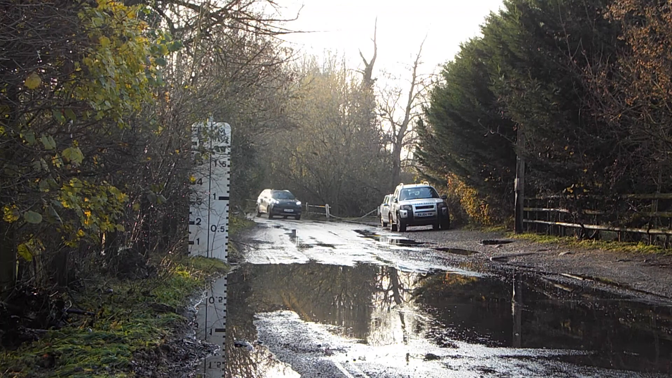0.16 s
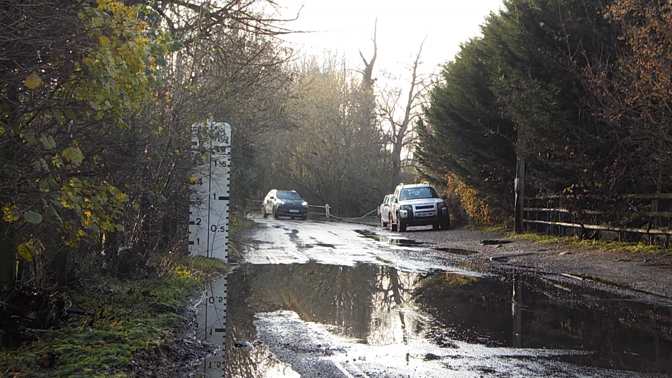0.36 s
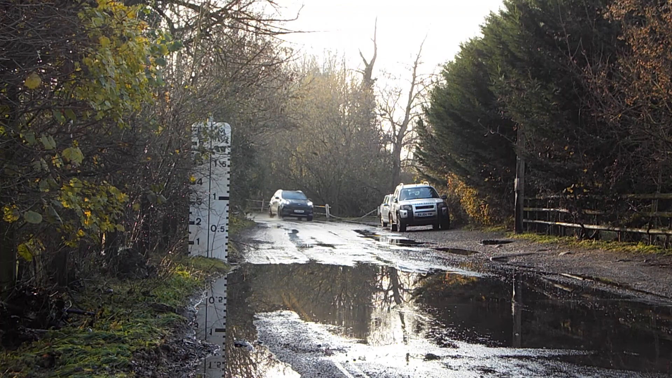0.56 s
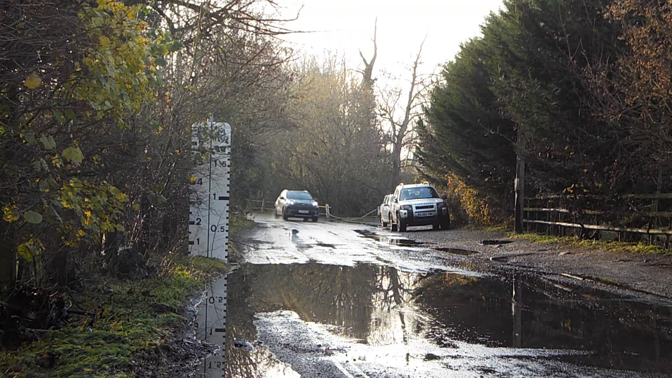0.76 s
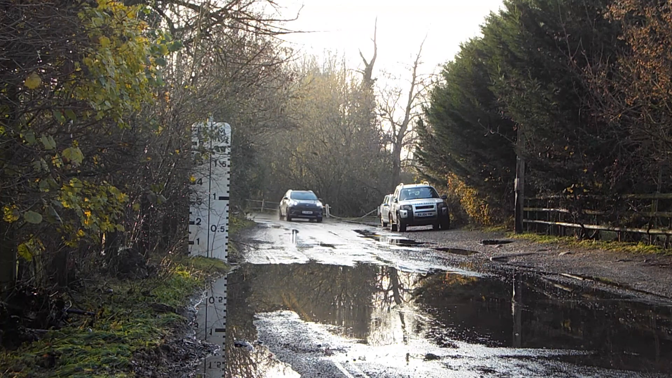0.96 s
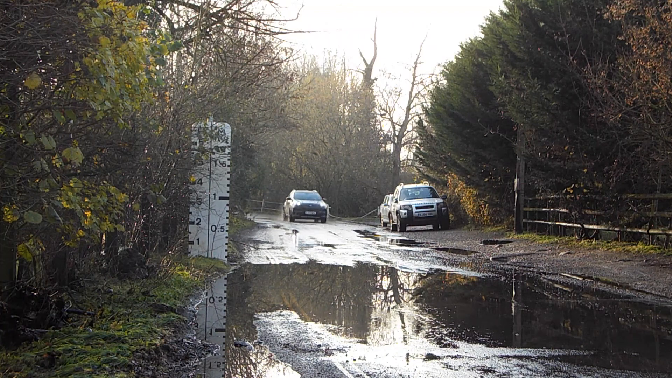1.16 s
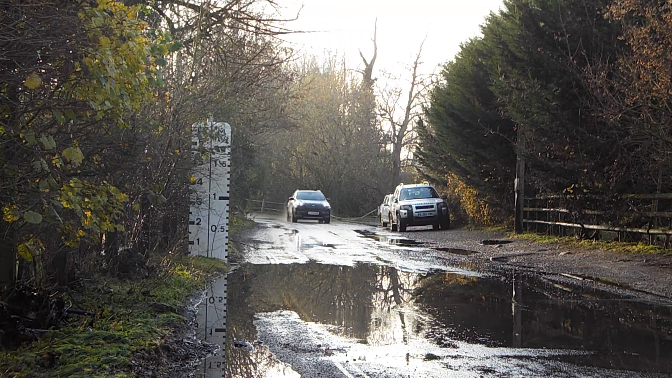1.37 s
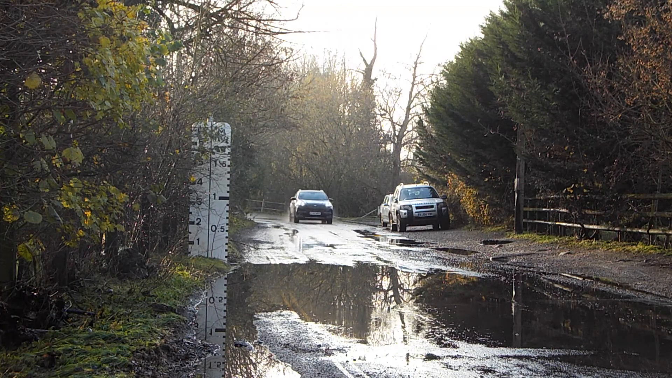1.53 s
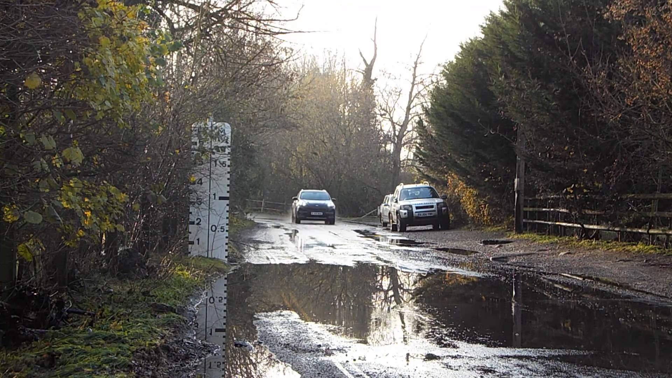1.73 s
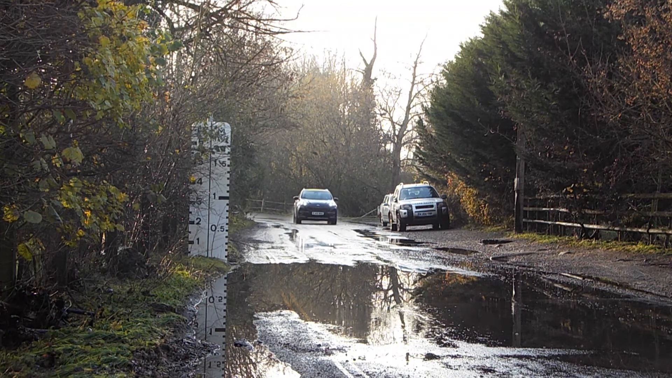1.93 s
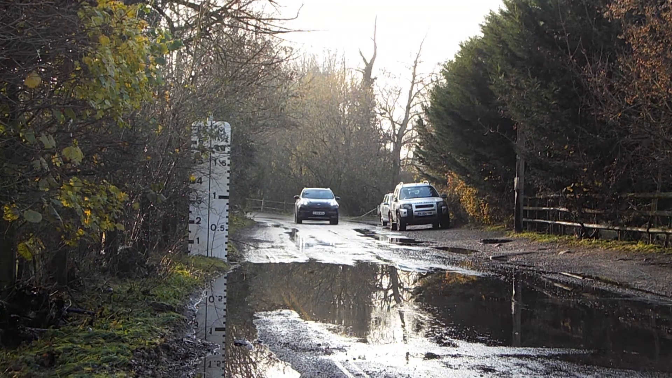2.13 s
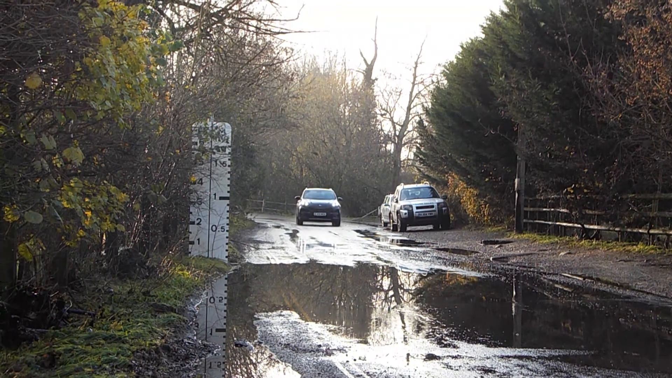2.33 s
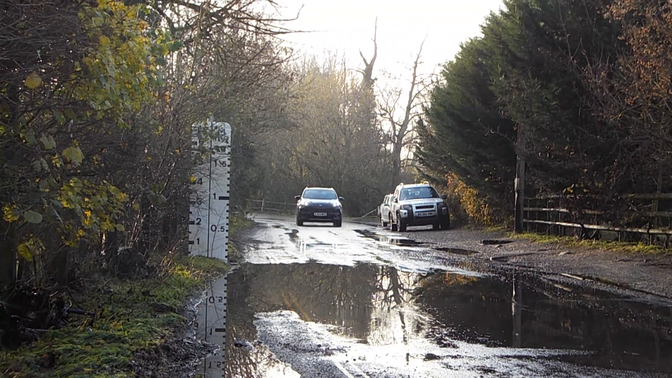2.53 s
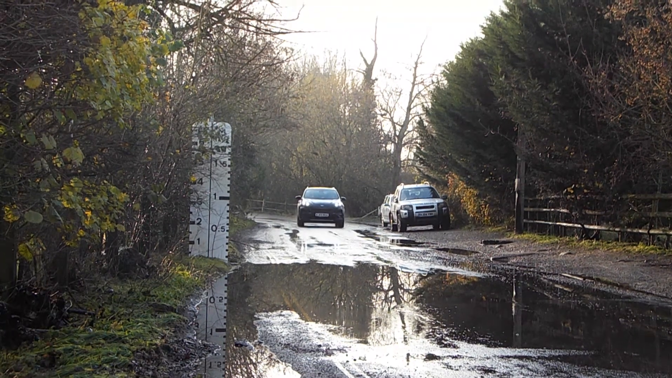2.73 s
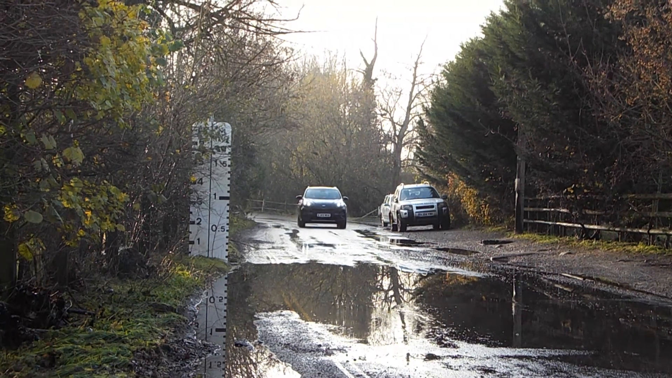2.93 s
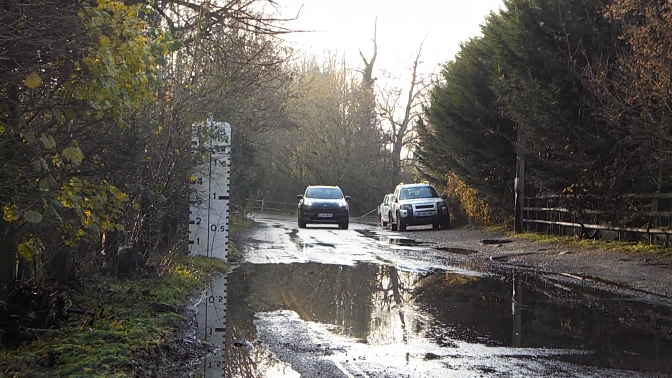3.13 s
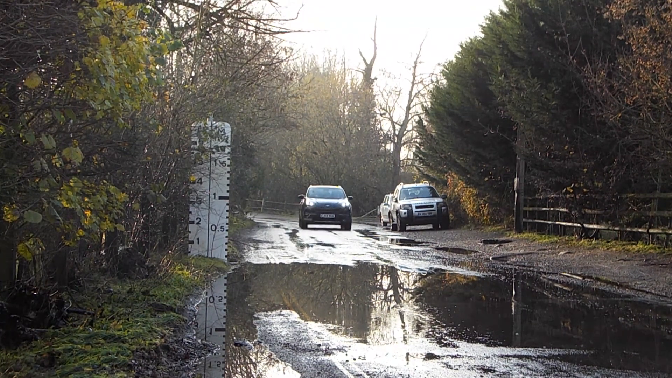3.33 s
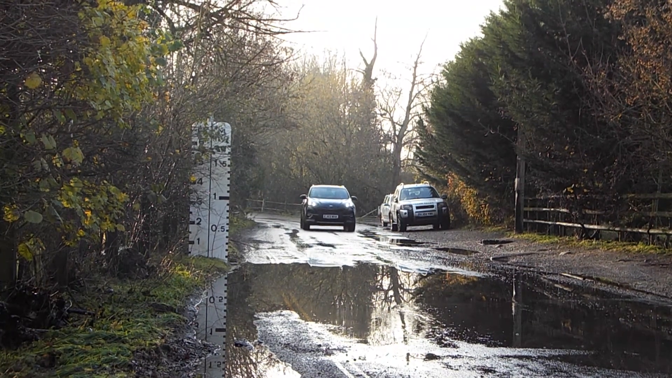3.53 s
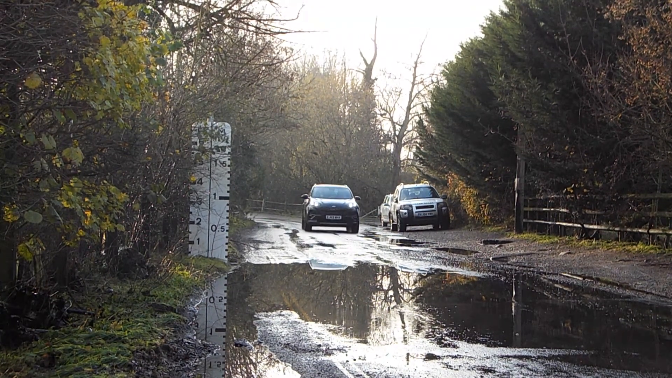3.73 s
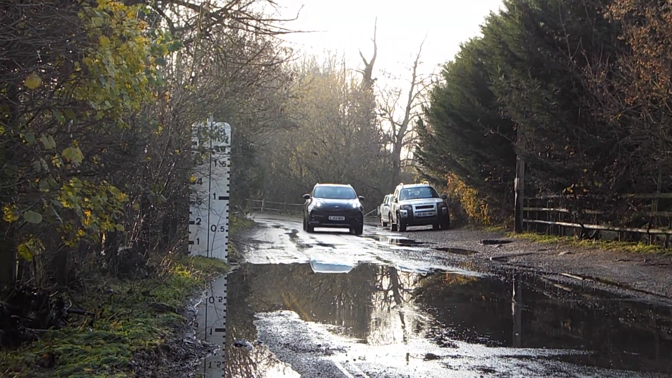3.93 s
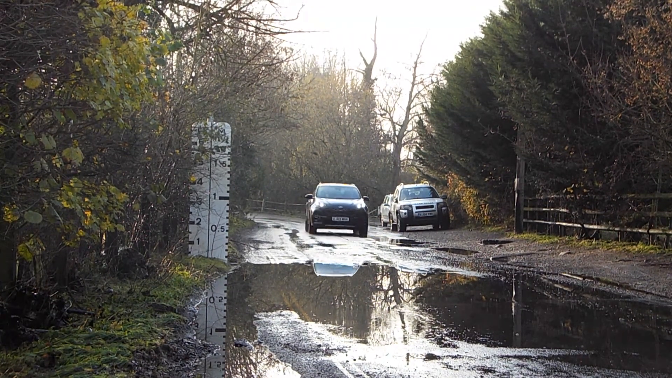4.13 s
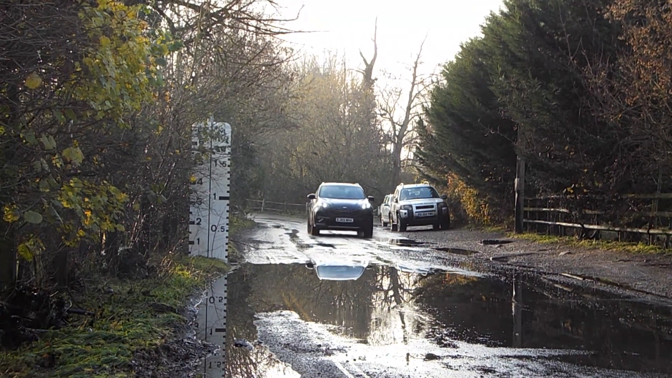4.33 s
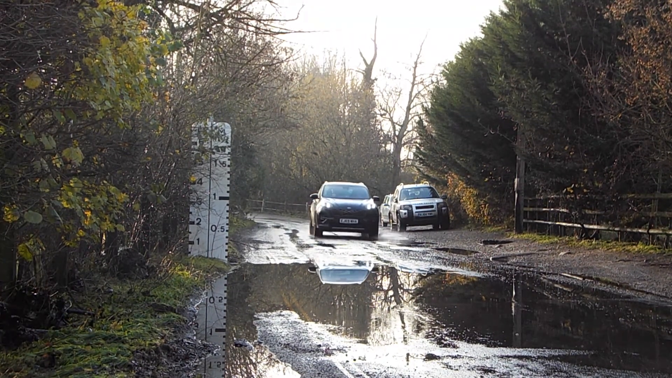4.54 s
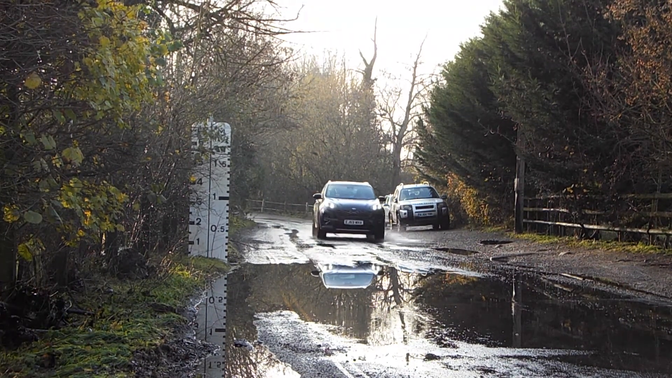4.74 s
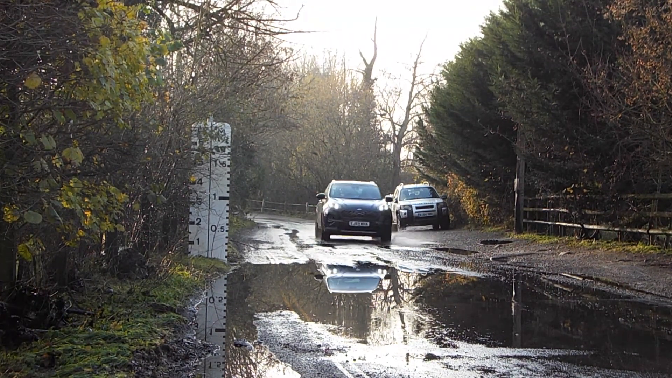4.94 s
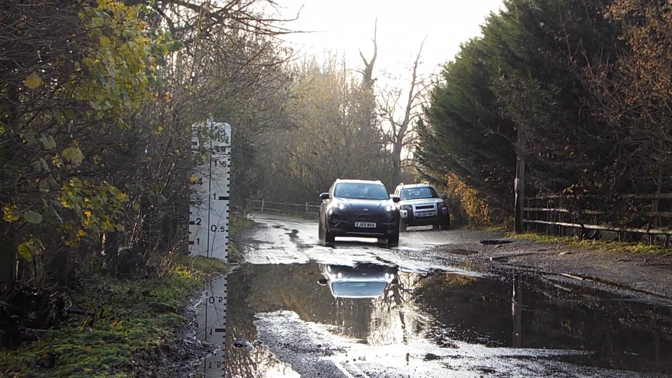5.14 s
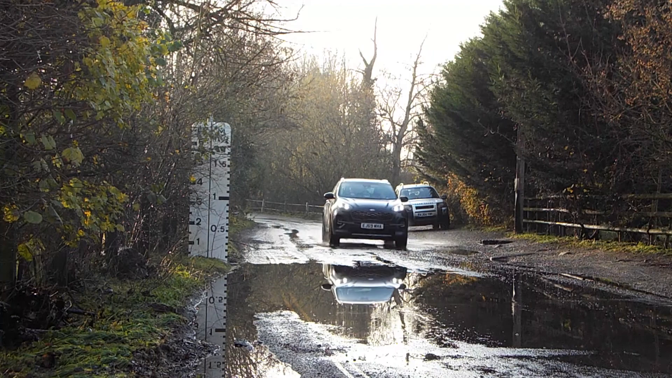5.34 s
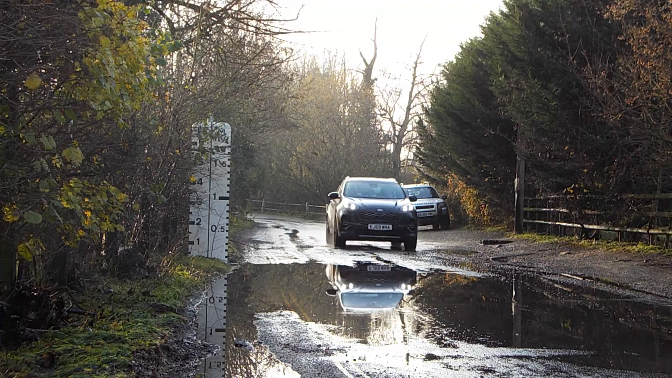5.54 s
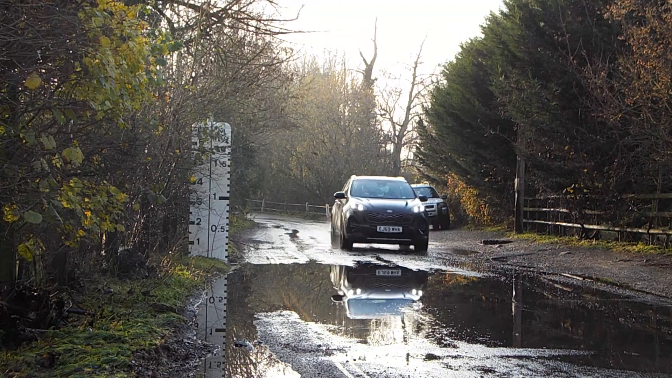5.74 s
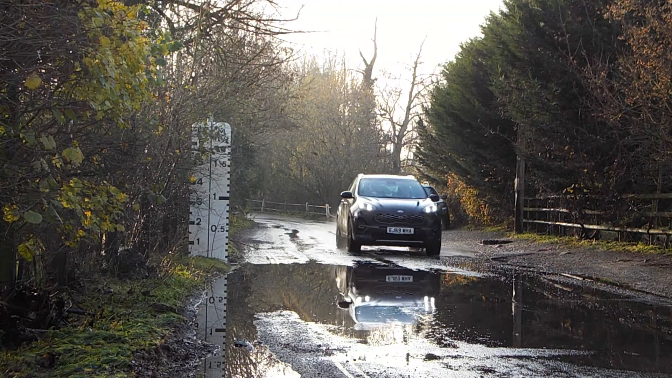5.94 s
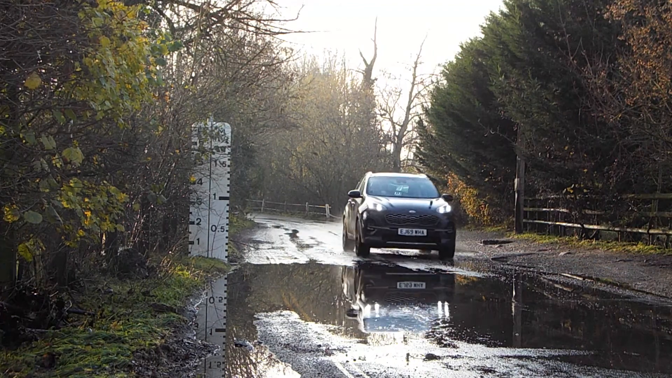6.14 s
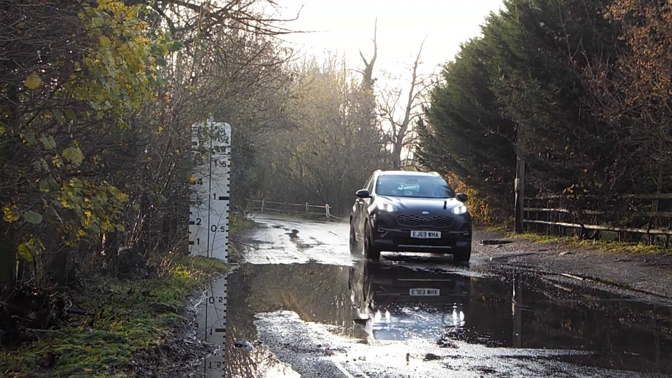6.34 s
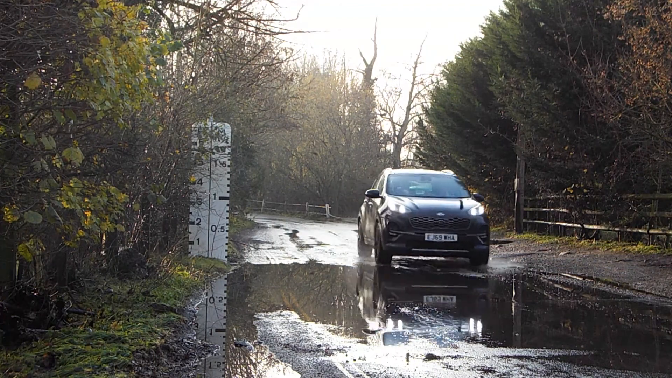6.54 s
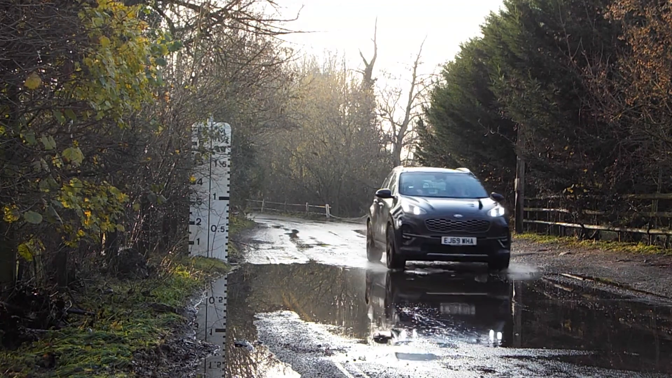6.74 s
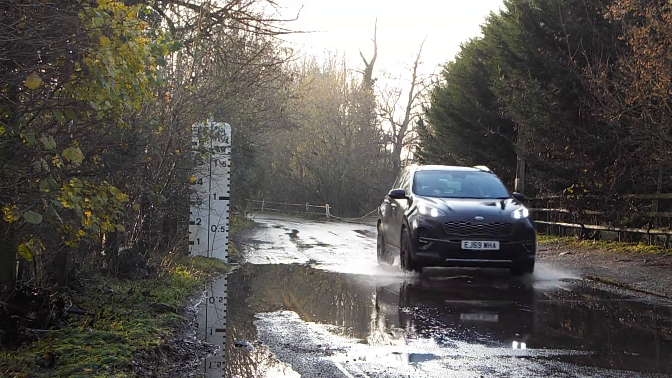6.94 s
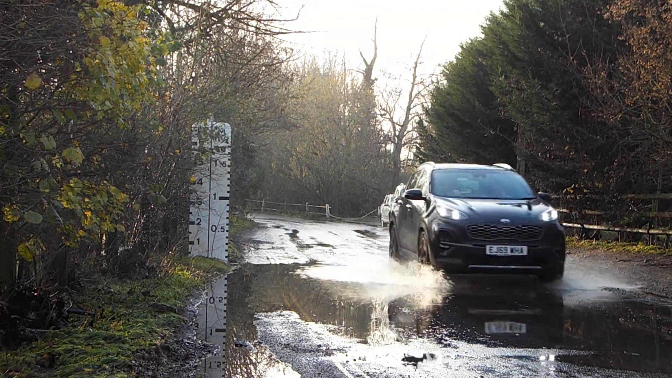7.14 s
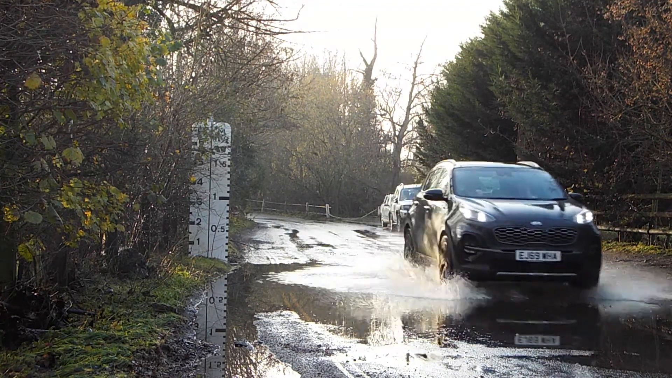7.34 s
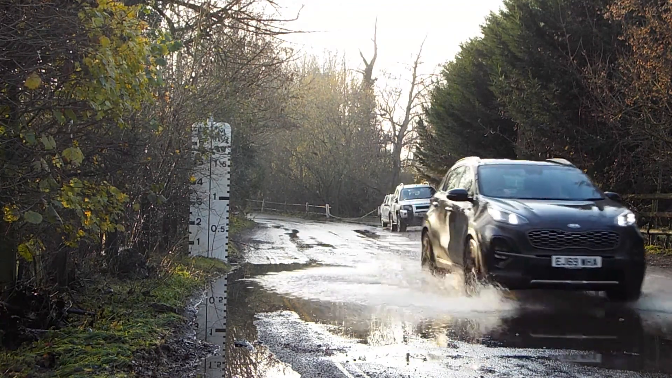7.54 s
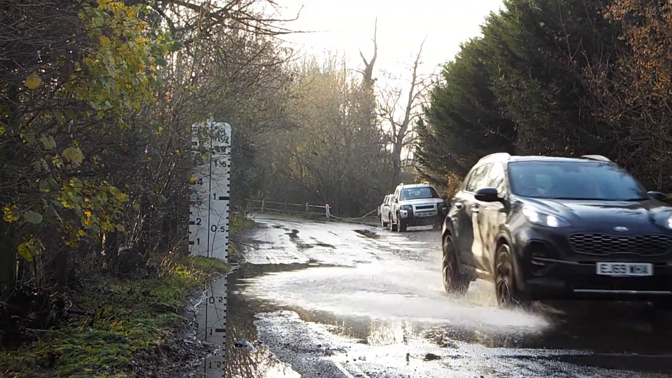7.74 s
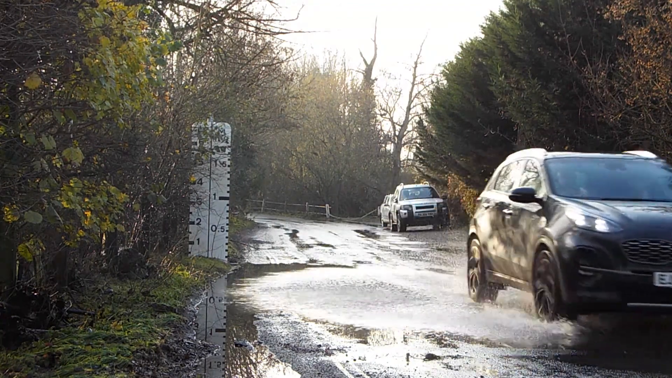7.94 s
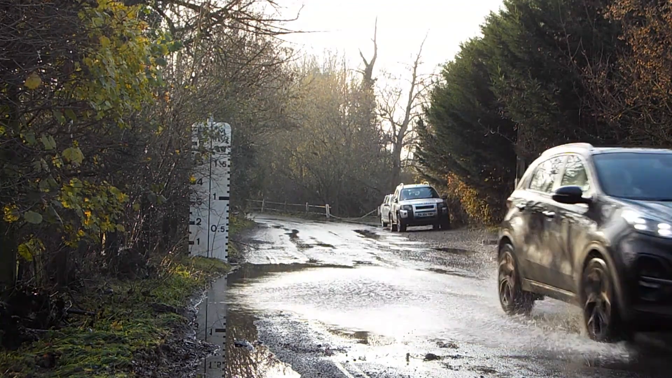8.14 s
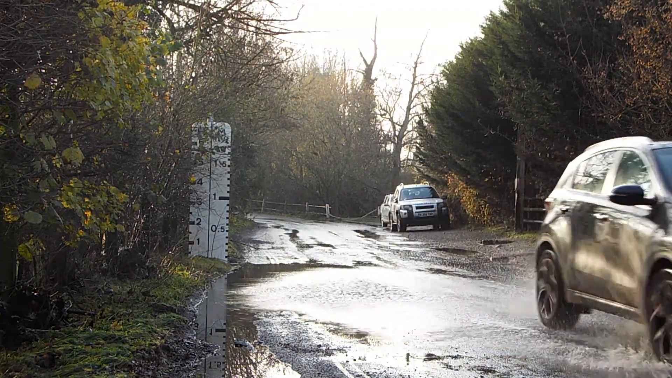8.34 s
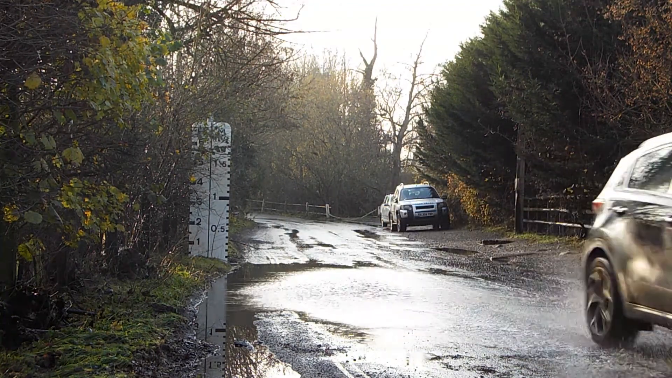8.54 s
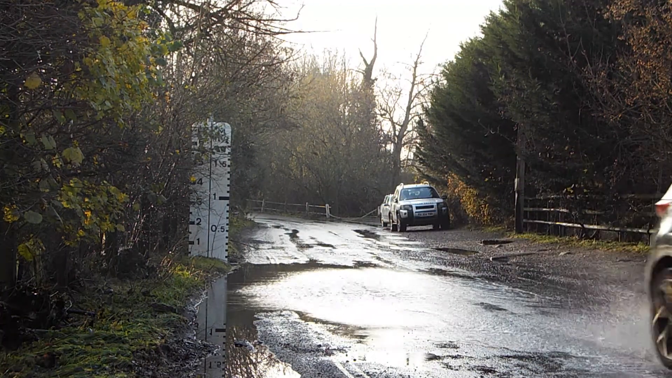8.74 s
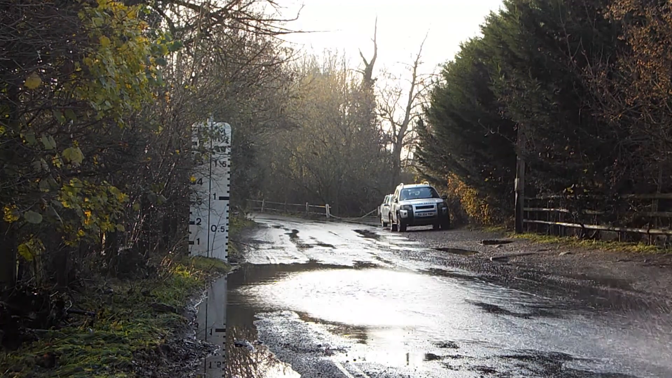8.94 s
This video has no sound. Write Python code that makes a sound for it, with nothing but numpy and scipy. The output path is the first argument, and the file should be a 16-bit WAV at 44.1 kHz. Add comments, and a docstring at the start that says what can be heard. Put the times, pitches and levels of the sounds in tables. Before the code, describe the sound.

Tyres swish over wet road, splash and crackle through shallow flood water, growing steadily from faint to loud as a car drives close by.

```python
"""A car comes down a wet lane between hedges and drives through flood water close by.
Its tyres roar and throw spray (coloured noise and random drops), slap into puddles (drop bursts) and
crack small stones (decaying sines). The road and surfaces beside the lane add late copies, and two
close microphone ports pick it up, over wavering hums, engine and distant rumble and faint hiss."""
import sys
import numpy as np
from scipy import signal
from scipy.fft import rfft, irfft, next_fast_len
from scipy.io import wavfile

SR = 44100
rng = np.random.default_rng(int(sys.argv[2]) if len(sys.argv) > 2 else 0)


def master_out(mix):
    """Clip the mix to full scale and print it as 16-bit PCM to the path in sys.argv[1]."""
    frames = np.transpose(np.atleast_2d(mix))
    ceiling = np.clip(frames, -1, 1)
    pcm = np.round(ceiling * 32767).astype(np.int16)
    wavfile.write(sys.argv[1], SR, pcm)


N = 396459

# low layers of the car: (t/s, carcass drone level/dB, engine and body rumble level/dB)
LOW_LEVELS = [(0.0, -55, -66), (0.9, -55, -64.5), (1.4, -56, -64), (1.9, -51, -64), (2.5, -52, -61),
              (3.7, -50.5, -64), (4.0, -49, -65.5), (5.0, -45, -63), (5.6, -45.5, -62), (6.1, -42.5, -54.5),
              (6.5, -40.5, -62), (6.95, -41.5, -52.5), (8.1, -39.5, -58), (8.75, -35.5, -59),
              (8.99, -34, -51)]


def from_db(db):
    """Decibels to gain."""
    return 10 ** (np.asarray(db) / 20)


def rms_one(x):
    """Scale to rms 1."""
    return x / np.sqrt(np.mean(x ** 2) + 1e-20)


def in_time(rows):
    """Columns of a curve table, interpolated at every sample."""
    s, *columns = np.transpose(rows)
    t = np.arange(N) / SR
    return [np.interp(t, s, column) for column in columns]


def colour(x, points):
    """Shape x by a spectrum of (f/Hz, gain/dB) points, straight on a log frequency axis."""
    size = next_fast_len(N)
    hz = np.maximum(np.arange(size // 2 + 1) * SR / size, 1)
    point_hz, point_db = np.array(points).T
    gain_db = np.interp(np.log(hz), np.log(point_hz), point_db)
    return irfft(rfft(x, size) * from_db(gain_db), size)[:N]


def drift(rate):
    """Slow random wander of spread about 1: noise through a two-pole low-pass near rate Hz."""
    step = 20   # samples between points of the wander
    r = np.exp(-2 * np.pi * rate * step / SR)
    noise = rng.standard_normal(N // step + 2002)
    slow = signal.lfilter([1], [1, -2 * r, r * r], noise)[2000:]   # drop the filter's start
    return np.interp(np.arange(N) / step, np.arange(len(slow)), rms_one(slow))


def droplets(per_s, spread_db, share):
    """Random impacts of uneven size carry a share of the power, smooth hiss the rest; rms about 1."""
    size_db = spread_db * np.minimum(rng.exponential(1, N), 5)
    sizes = from_db(size_db) * rng.choice([-1, 1], N)
    impacts = rms_one(sizes * (rng.random(N) < per_s / SR))
    return np.sqrt(share) * impacts + np.sqrt(1 - share) * rng.standard_normal(N)


def ring(clicks, hz, t60):
    """A unit click sets a resonator ringing: a sine of height about 1 that falls 60 dB in t60 seconds."""
    r, w = from_db(-60 / (t60 * SR)), 2 * np.pi * hz / SR
    return signal.lfilter([0, np.sin(w)], [1, -2 * r * np.cos(w), r * r], clicks)


def tyres(flutter):
    """Carcass drone, tread roar, churned water, spray and mist; the water sheet flutters, so they throb together."""
    # base levels: (t/s, tread roar level/dB, churned water level/dB, spray level/dB, fine mist level/dB)
    tyre_levels = [(0.0, -53.5, -59.5, -66, -66), (0.4, -51, -52.5, -57, -67),
                   (0.6, -48.5, -46.5, -50.5, -66), (1.0, -47, -45, -47.5, -65),
                   (1.6, -47.5, -42.5, -48.5, -61), (2.07, -47.5, -48.5, -49, -65),
                   (2.7, -47, -50, -49.5, -61.5), (3.3, -46, -48, -49, -62), (3.7, -46, -46, -46.5, -56),
                   (4.4, -43.5, -44, -44.5, -60), (4.9, -40.5, -41.5, -42, -57),
                   (5.3, -40, -39, -36.5, -50), (6.0, -37, -37, -37, -50),
                   (6.4, -35.5, -35.5, -34.5, -49.5), (6.9, -32, -33, -33.5, -44.5),
                   (7.55, -32, -32, -33.5, -37.5), (8.0, -31.5, -29.5, -32, -38),
                   (8.45, -31, -29.5, -31, -36), (8.7, -30, -26.5, -24.5, -33.5),
                   (8.99, -32.5, -27.5, -23, -35)]
    # spectra of drone, roar, churned water, spray and mist: (f/Hz, relative level/dB per Hz)
    drone_spectrum = [(150, -60), (250, -21), (312, -18), (439, -5.5), (534, -5), (788, 2.5), (896, -0.5),
                      (1000, -1.5), (1300, -42), (2200, -120)]
    roar_spectrum = [(560, -45), (950, -14.5), (1100, 3.5), (1340, 1.5), (1540, 4), (1900, 3.5),
                     (2200, -7.5), (2860, -12), (4840, -120)]
    churn_spectrum = [(1180, -56), (2000, 0), (2200, 3), (2410, 1), (2620, 0.5), (3320, -3.5), (4500, -8.5),
                      (5850, -13), (9900, -120)]
    spray_spectrum = [(2530, -21.5), (4300, -2.5), (5610, 4.5), (7690, -9), (9000, -12.5), (11700, -24),
                      (19800, -120)]
    mist_spectrum = [(4120, -21), (7000, 2), (7680, -6), (11400, -8), (14000, -17), (15500, -23)]
    roar_share, churn_share = 0.39, 0.71   # share of the spray's swell in dB

    drone_db = in_time(LOW_LEVELS)[0]
    roar_db, churn_db, spray_db, mist_db = in_time(tyre_levels)
    swell, mist_swell = puddle_swell()

    tread = droplets(per_s=900, spread_db=3.5, share=0.29)
    drone = rms_one(colour(tread, drone_spectrum))
    roar = rms_one(colour(tread, roar_spectrum))
    drops = droplets(per_s=4000, spread_db=5.0, share=0.26)
    churn = rms_one(colour(drops, churn_spectrum))
    spray = rms_one(colour(drops, spray_spectrum))
    fine_drops = droplets(per_s=6400, spread_db=3.5, share=0.12)
    mist = rms_one(colour(fine_drops, mist_spectrum))

    # the brighter layers follow the shared flutter more; all but the mist also waver on their own
    return (drone * from_db(drone_db + 0.39 * flutter + 0.98 * drift(12))
            + roar * from_db(roar_db + roar_share * swell + 0.5 * flutter + 0.82 * drift(29))
            + churn * from_db(churn_db + churn_share * swell + 0.79 * flutter + 0.5 * drift(25))
            + spray * from_db(spray_db + swell + flutter + 0.5 * drift(36))
            + mist * from_db(mist_db + mist_swell + flutter))


def puddle_swell():
    """Wheels run through puddles: spray and mist lift in straight dB ramps; the largest lift wins."""
    # puddles: (peak t/s, spray swell/dB, mist swell/dB, rise/s, fall/s)
    puddles = [(0.48, 7.5, 3, .07, 0.077), (0.77, 4, 5, 0.079, 0.07), (0.885, 5, 6, .08, 0.11),
               (1.27, 5.5, 1, 0.2, 0.3), (1.88, 2.5, 1, .2, 0.063), (2.13, 7.5, 4, .04, .13),
               (2.31, 9.5, 6, .015, 0.042), (2.58, 3.5, 0, 0.19, .1), (2.79, 2, 3, .02, 0.12),
               (3.23, 4.5, 7, 0.056, .07), (3.38, 8.5, 10, .03, .2), (3.65, 4.5, 4, .07, 0.062),
               (3.83, 6, 7, 0.036, 0.05), (4.01, 4.5, 4, .03, 0.082), (4.14, 4.5, 4, 0.053, 0.15),
               (4.29, 6.5, 6, 0.048, 0.12), (4.48, 4, 1, 0.15, 0.067), (4.76, 0.5, 5, .12, 0.09),
               (5.06, 3.5, 0, 0.14, .04), (5.32, 4, 4, 0.021, .22), (5.63, 6, 2, 0.047, .16),
               (6.07, 7, 1, 0.027, 0.13), (6.16, 7, 3, 0.27, 0.27), (6.46, 3.5, 6, .03, 0.035),
               (6.68, 6, 8, 0.24, .2), (7.84, 1, -3.5, .15, .12), (8.31, 3, 1, 0.38, 0.13)]
    t = np.arange(N) / SR
    lifts = []
    for s, spray_db, mist_db, rise, fall in puddles:
        ramp = np.interp(t, [s - rise, s, s + fall], [0, 1, 0])
        lifts.append(np.outer([spray_db, mist_db], ramp))
    return np.max(lifts, axis=0)


def splashes():
    """Each tyre slap is a broad burst of drops that rises in a few ms and dies away."""
    # slaps into puddles: (t/s, level/dB, t60/s)
    slaps = [(0.4375, -40, 0.15), (0.4985, -33, 0.11), (1.1508, -36, 0.16), (2.1034, -26.5, 0.081),
             (2.1594, -35, 0.12), (2.7804, -42, 0.15), (3.2454, -38, 0.13), (3.3588, -34, 0.091),
             (3.4151, -38, 0.12), (3.8124, -36, 0.14), (4.0038, -34.5, 0.22), (5.2854, -34, 0.12),
             (5.585, -42, 0.1), (5.8444, -44, 0.15), (6.031, -44, 0.25), (7.8515, -24, 0.23)]
    # slap spectrum: (f/Hz, relative level/dB per Hz)
    slap_spectrum = [(500, -21), (1000, -4), (2000, 5), (3500, 3.5), (5500, 8.5), (7500, -7), (12000, -29),
                     (16000, -38)]
    envelope = np.zeros(N)
    for s, level_db, t60 in slaps:
        start = round(s * SR)
        t = np.arange(N - start)[:SR // 2] / SR
        shape = (1 - np.exp(-t / 0.0011)) * from_db(-60 * t / t60)
        envelope[start:start + len(t)] += from_db(level_db) * shape
    drops = droplets(per_s=3300, spread_db=-2.0, share=0.35)
    return envelope * rms_one(colour(drops, slap_spectrum))


def pops():
    """Stones and water pockets crack under the tread: a short hollow knock, a brief bright crack, no bass."""
    # cracks: (t/s, knock level before the band-pass/dB, f/Hz, crack relative to knock/dB)
    cracks = [(1.1708, -30, 1800, -15), (2.2255, -25, 900, -15), (2.3078, -10, 1250, -9),
              (2.3200, -27, 1700, -15), (2.6205, -29, 1150, -15), (2.8909, -30, 1800, -15),
              (5.2381, -23, 1200, -15), (6.0305, -14, 1200, -20), (6.6579, -14, 2000, -15),
              (7.1627, -17, 2100, -15), (7.2326, -16, 1900, -15), (7.2599, -8, 1700, -20),
              (7.2641, -5, 1350, -20), (7.2668, -9, 1500, -20), (7.3742, -16, 2000, -15),
              (7.5214, -13, 1400, -20), (7.5370, -13, 1300, -20), (7.7140, -7, 2000, -20),
              (8.1904, -14, 2100, -15), (8.3934, -14, 2100, -15), (8.6818, -12, 2100, -15)]
    out, click = np.zeros(N), np.zeros(1000)
    click[0] = 1
    for s, knock_db, hz, crack_db in cracks:
        knock = ring(click, hz, t60=7 / hz)   # only two or three cycles stand out
        crack = from_db(crack_db) * ring(click, 6200, t60=0.0035)
        start = round(s * SR)
        out[start:start + 1000] -= from_db(knock_db) * (knock + crack)
    return signal.sosfilt(signal.butter(4, [650, 9000], "band", fs=SR, output="sos"), out)


def mirrored(x):
    """Add late copies: the road returns everything, the main surface the middle treble, small ones the top."""
    # echo off the wet road just ahead of the wheels: (t/s, lateness/ms, level/dB)
    road_echo = [(0.2, .3, -26), (0.5, .28, -18), (1.0, .25, -15), (1.3, .2, -11), (1.5, .165, -10),
                 (1.8, .133, -12), (2.2, .125, -12), (3.0, .122, -11), (3.4, .135, -11), (3.7, .158, -11),
                 (4.0, .19, -12), (4.3, .24, -17), (4.7, .3, -30)]
    # mirror image off the main surface beside the lane: (t/s, lateness/ms, level/dB)
    main_image = [(0, 4.08, -18), (.3, 4.0, -16), (1, 2.5, -14), (1.3, 2.08, -11), (1.6, 1.92, -11),
                  (2.1, 1.8, -10), (2.7, 1.75, -10), (3.4, 1.72, -10.5), (3.9, 1.81, -10), (4.3, 1.85, -10),
                  (4.7, 1.92, -20), (5.3, 1.96, -22), (9, 1.95, -24)]
    # smaller surfaces near it: (from t/s, to t/s, lateness beyond the main image/ms, level/dB)
    small_surfaces = [(1.85, 3.6, -.17, -10), (2.6, 3.65, -.4, -14), (1.7, 2.6, .8, -16),
                      (4.05, 6.9, .85, -14)]
    fade_db_per_s = 100   # small surfaces fade in and out around their times
    fine = 4              # oversampling, for smooth fractional delays

    whole = signal.resample_poly(x, fine, 1)
    broad = signal.lfilter(*signal.butter(1, [1500, 7500], "band", fs=fine * SR), whole)
    bright = signal.lfilter(*signal.butter(1, [6000, 14000], "band", fs=fine * SR), whole)

    t = np.arange(N) / SR
    road_ms, road_db = in_time(road_echo)
    main_ms, main_db = in_time(main_image)
    paths = [(whole, road_ms, road_db), (broad, main_ms, main_db)]
    for start, end, extra_ms, db in small_surfaces:
        outside_s = np.maximum(np.maximum(start - t, t - end), 0)
        paths.append((bright, main_ms + extra_ms, db - fade_db_per_s * outside_s))

    out, places = x.copy(), np.arange(len(whole), dtype=float)
    for sound, late_ms, level_db in paths:
        late_ms = late_ms * (1 + 0.01 * drift(2.5))   # the car rocks, so the paths waver
        where = fine * (np.arange(N) - late_ms * SR / 1000)
        out += from_db(level_db) * np.interp(where, places, sound)
    return out


def hums():
    """Two hums from the car: sines whose strength and pitch waver."""
    # one table per hum, centre of the wavering: (t/s, f/Hz, rms level/dB)
    hum_curves = [
        [(3.8, 269.7, -83), (4.4, 271.4, -76), (5.5, 263.7, -70), (6.4, 246.7, -64), (6.8, 244.6, -66),
         (9, 238.3, -70)],
        [(4.5, 205, -93), (5.8, 211.3, -76), (7, 208.5, -76.5), (8.4, 205.3, -64.5), (9, 214.7, -56.5)],
    ]
    out = np.zeros(N)
    for hz, level_db in map(in_time, hum_curves):
        turns = np.cumsum(hz + 7 * drift(10)) / SR
        strength = np.sqrt(2) * from_db(level_db + 3.6 * drift(1.6))
        out += strength * np.sin(2 * np.pi * turns)
    return out


def background():
    """Engine and body rumble, steady distant rumble and steady faint hiss, all coloured noise."""
    # spectra of engine and body, distant rumble and hiss: (f/Hz, relative level/dB per Hz)
    engine_spectrum = [(35, -55), (60, -21), (173, -12.5), (210, -8), (260, -11.5), (311, -17), (420, -7),
                       (550, -5), (920, -120)]
    far_spectrum = [(12, -58), (20, -26), (145, -9), (168, -2.5), (228, -24), (289, -4), (400, -5),
                    (520, -38), (880, -120)]
    hiss_spectrum = [(1760, -32), (3000, -13), (5310, -3), (10600, -26), (13900, 13), (15500, 6)]
    rumble_db = in_time(LOW_LEVELS)[1]
    rumble = from_db(rumble_db) * rms_one(colour(rng.standard_normal(N), engine_spectrum))
    far = from_db(-75) * rms_one(colour(rng.standard_normal(N), far_spectrum))
    hiss = from_db(-73) * rms_one(colour(rng.standard_normal(N), hiss_spectrum))
    return rumble + far + hiss


def scene():
    """A common part at both ports plus an unlike part of opposite sign, weak in the middle range."""
    # filter for the unlike part: (f/Hz, gain/dB)
    unlike_gain = [(60, -9), (92, -13), (140, -16), (210, -15), (330, -17.5), (500, -21), (770, -22),
                   (1170, -35), (1790, -43), (2740, -40), (4190, -21), (6410, -12.5), (9810, -9),
                   (15000, -5)]
    # balance of the common part: (f/Hz, left minus right/dB)
    balance = [(60, -1.0), (92, -0.5), (140, 0), (210, 0.5), (330, 1.5), (500, 1.0), (770, 1.5),
               (1170, 0.5), (1790, 0.0), (2740, 0.0), (4190, 0.5), (6410, -0.5), (9810, 3.5), (15000, 2.0)]
    flutter = 0.62 * drift(19) + 0.5 * drift(75)
    # small wheels radiate no deep bass
    no_bass = signal.butter(4, 133, "high", fs=SR, output="sos")
    wheels = signal.sosfilt(no_bass, tyres(flutter) + splashes() + pops())
    unlike_wheels = signal.sosfilt(no_bass, tyres(flutter) + splashes())   # fresh noise, same flutter
    common = mirrored(wheels) + background() + hums()
    unlike = colour(mirrored(unlike_wheels) + from_db(4) * background(), unlike_gain)
    left = colour(common, [(hz, db / 2) for hz, db in balance])
    right = colour(common, [(hz, -db / 2) for hz, db in balance])
    return np.array([left + unlike, right - unlike])


def record(dry):
    """A steep elliptic low-pass cuts the top above 15.72 kHz."""
    return signal.sosfilt(signal.ellip(12, 0.5, 80, 15720, fs=SR, output="sos"), dry)


dry = scene()
out = record(dry)
master_out(out)
```